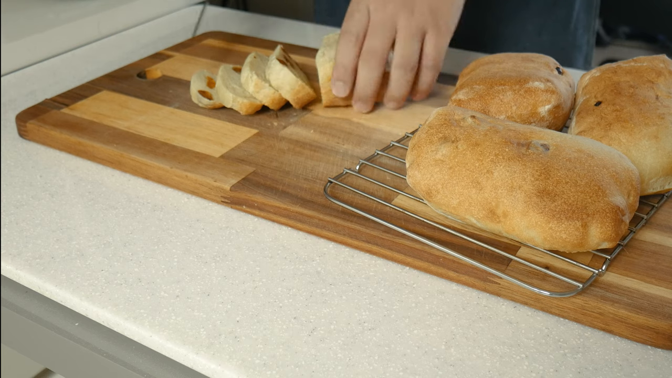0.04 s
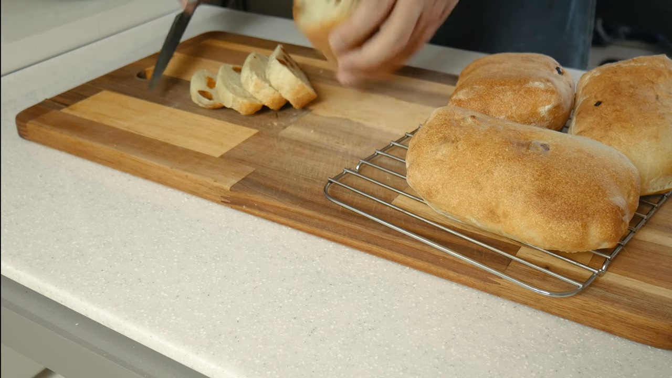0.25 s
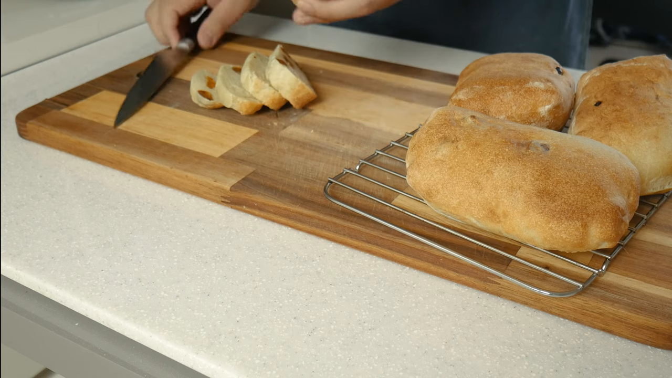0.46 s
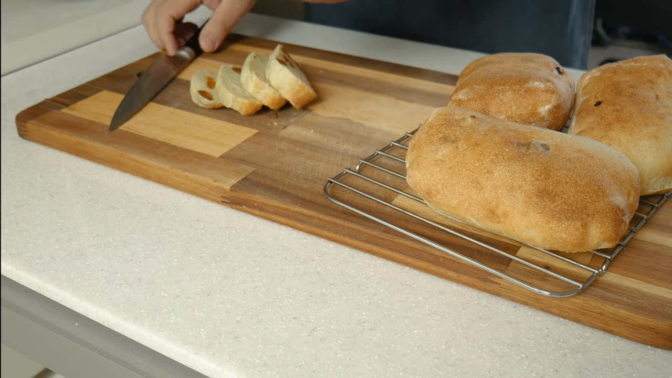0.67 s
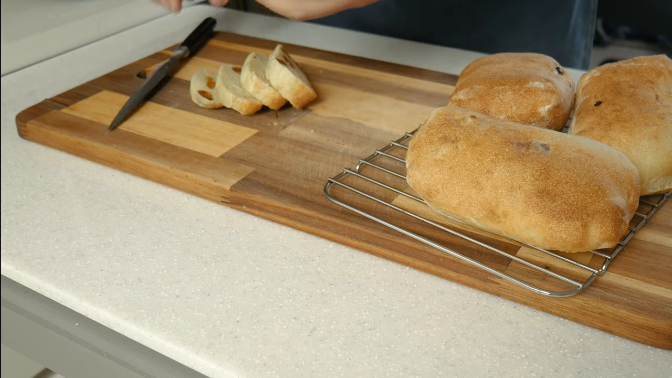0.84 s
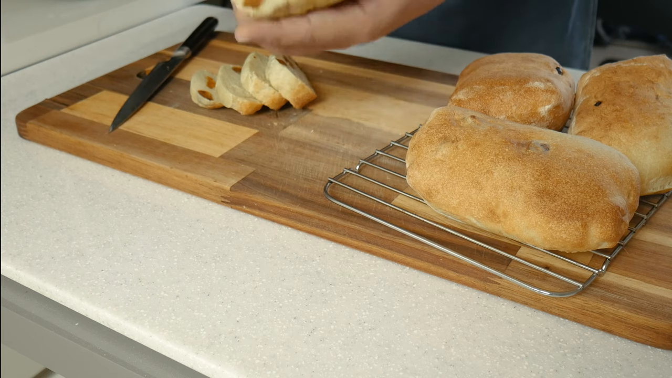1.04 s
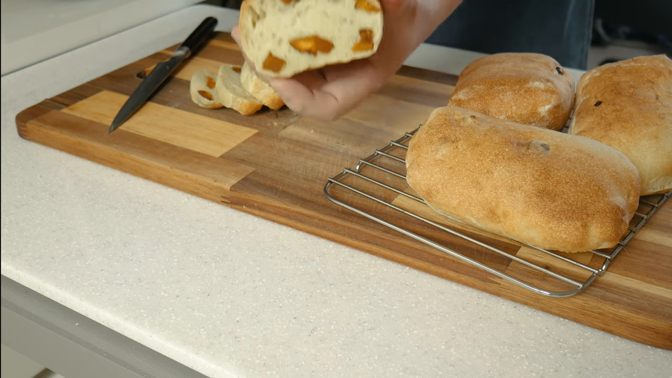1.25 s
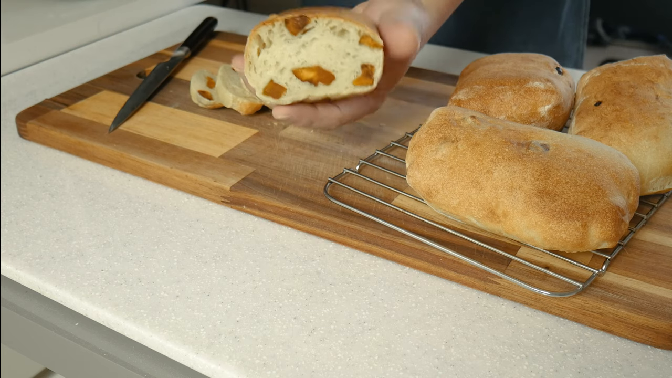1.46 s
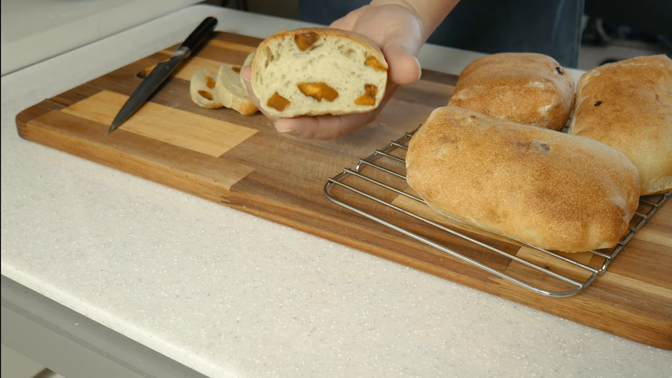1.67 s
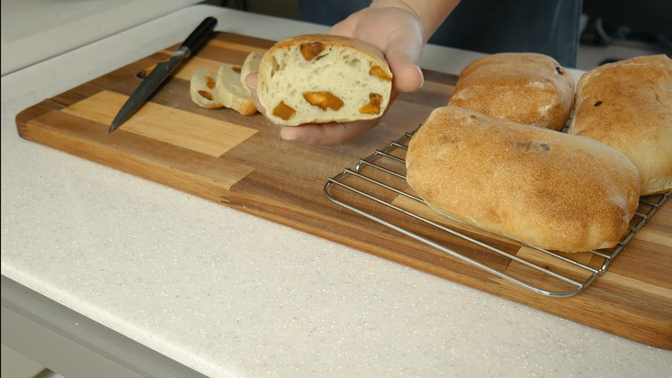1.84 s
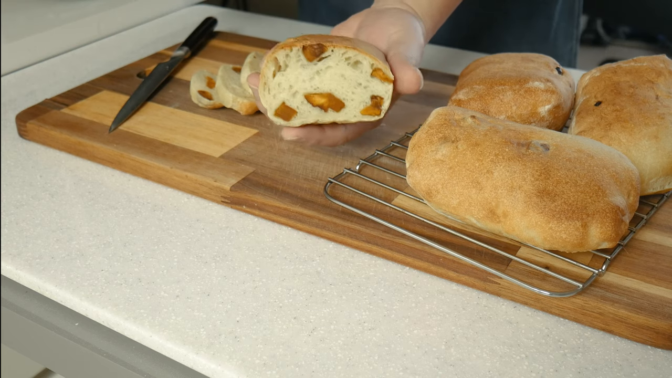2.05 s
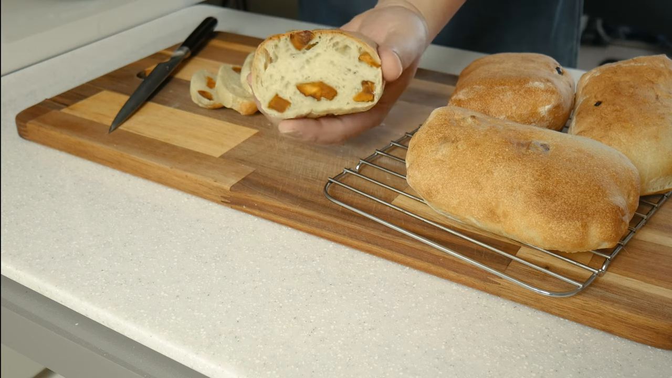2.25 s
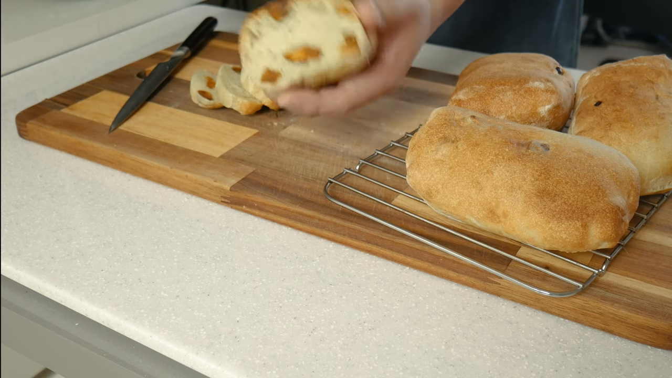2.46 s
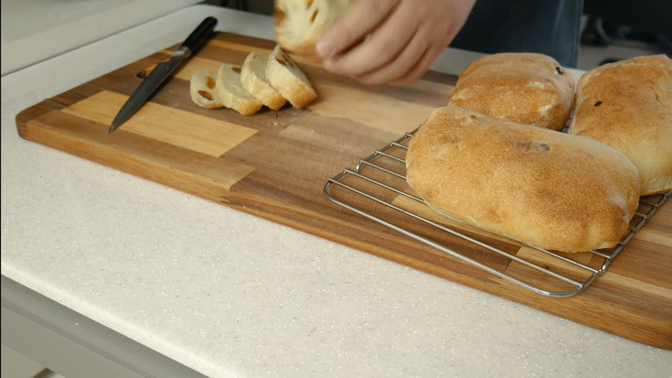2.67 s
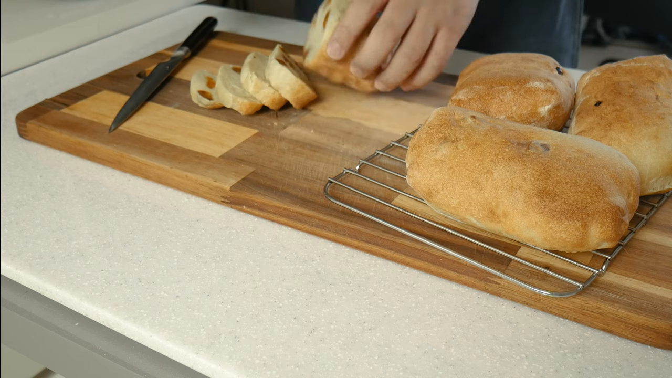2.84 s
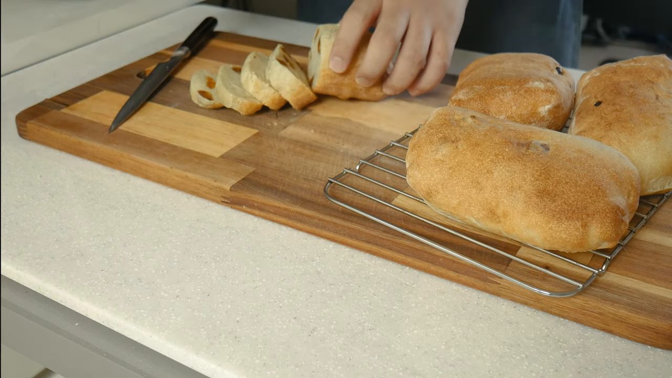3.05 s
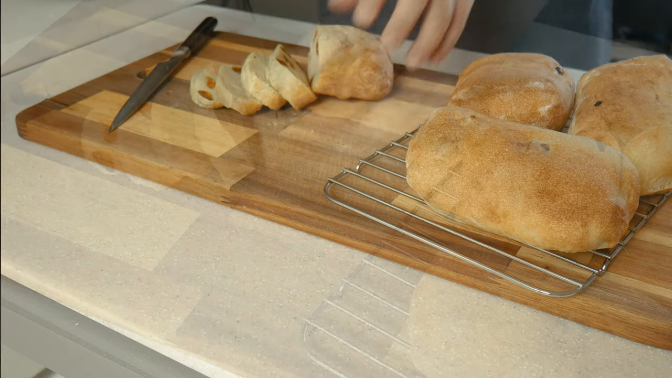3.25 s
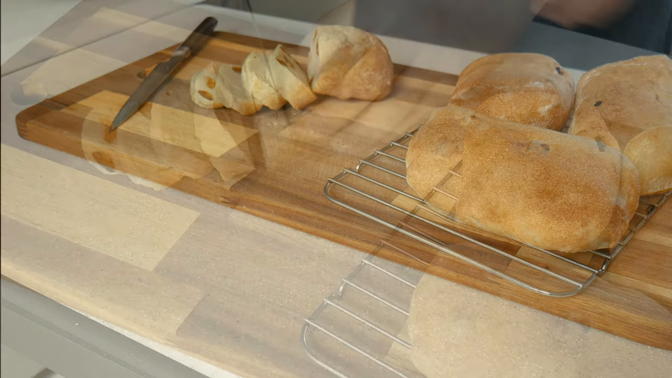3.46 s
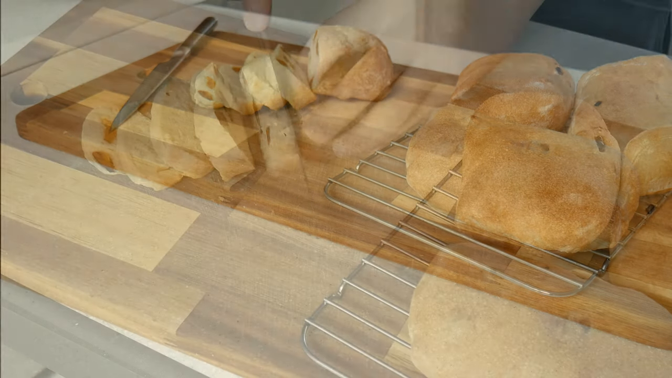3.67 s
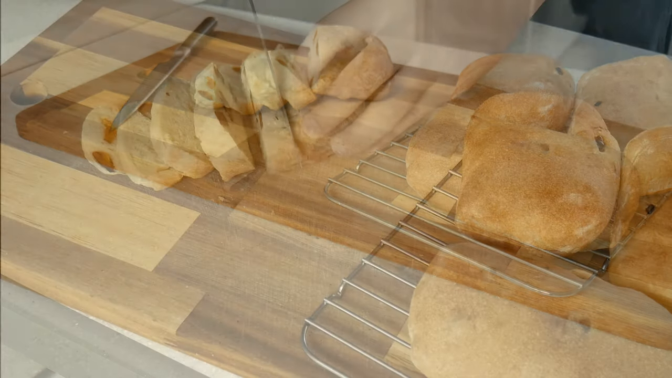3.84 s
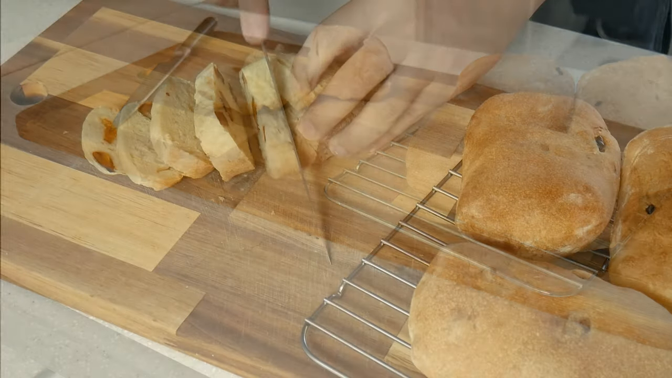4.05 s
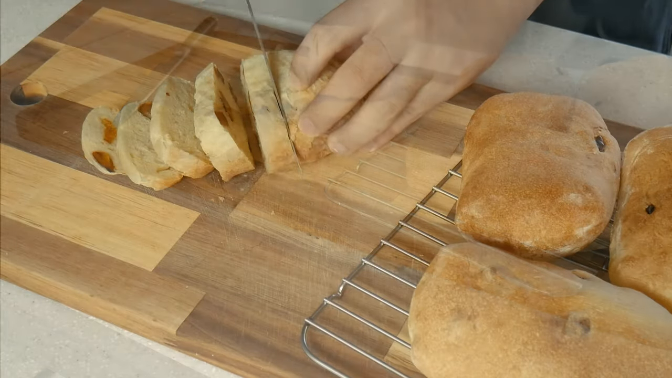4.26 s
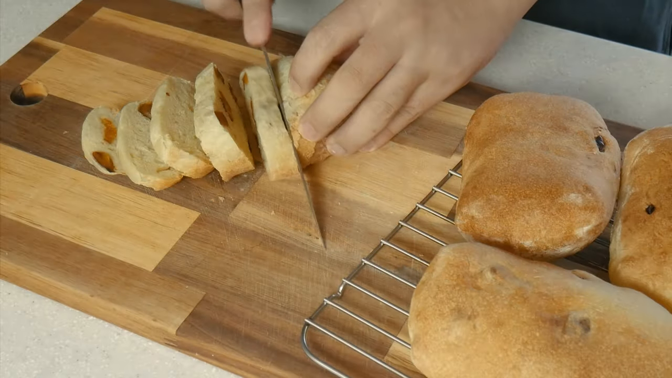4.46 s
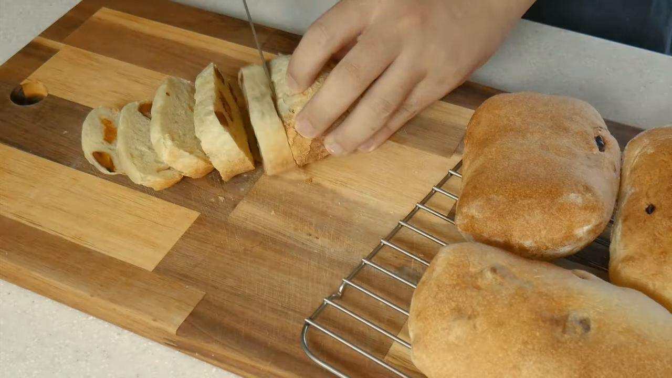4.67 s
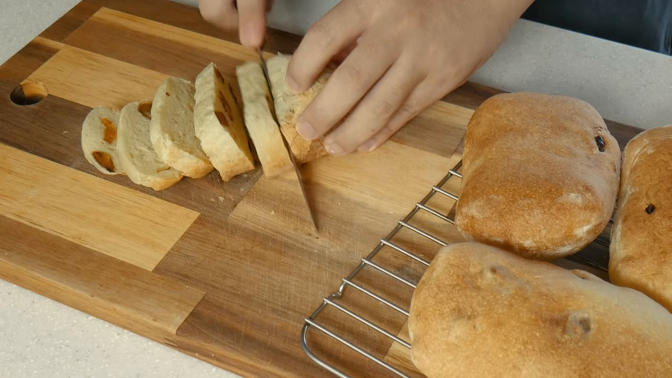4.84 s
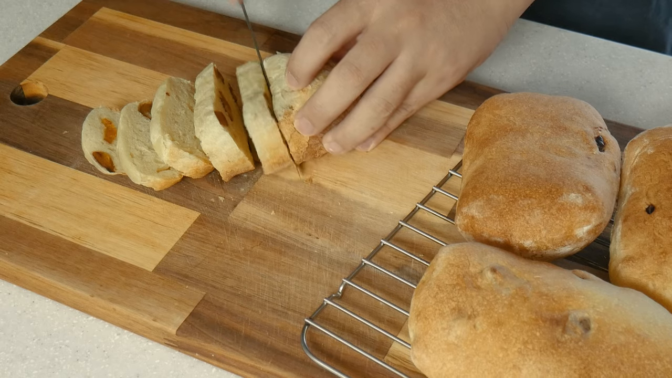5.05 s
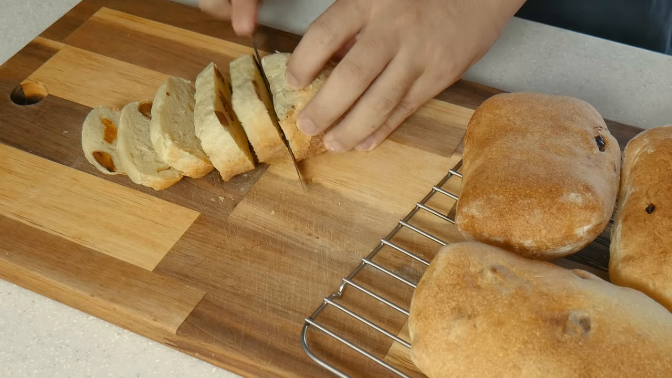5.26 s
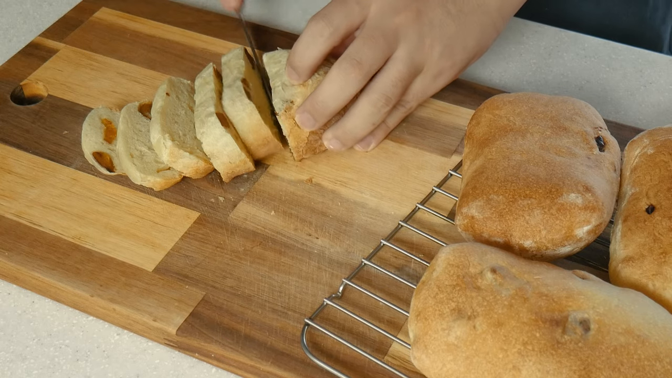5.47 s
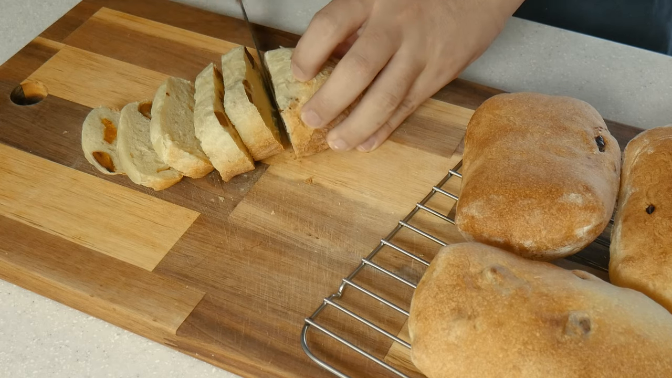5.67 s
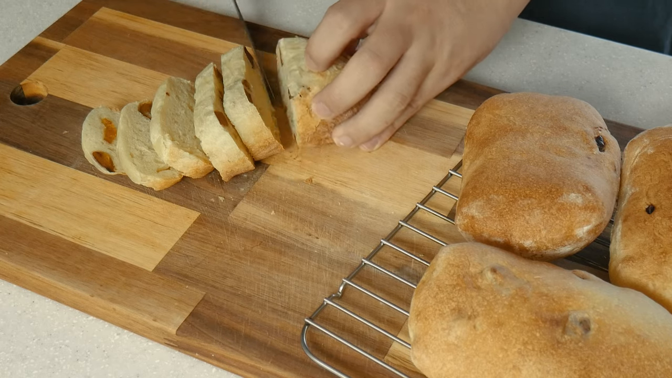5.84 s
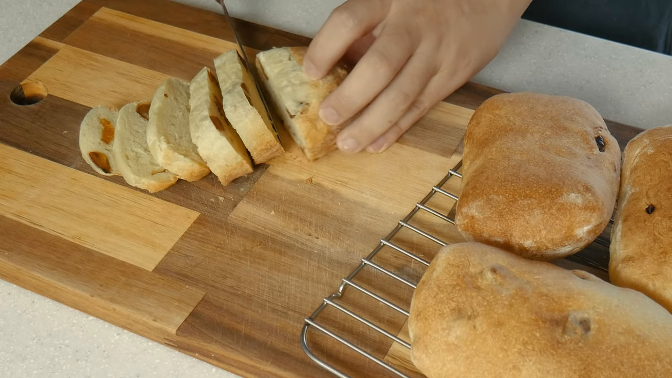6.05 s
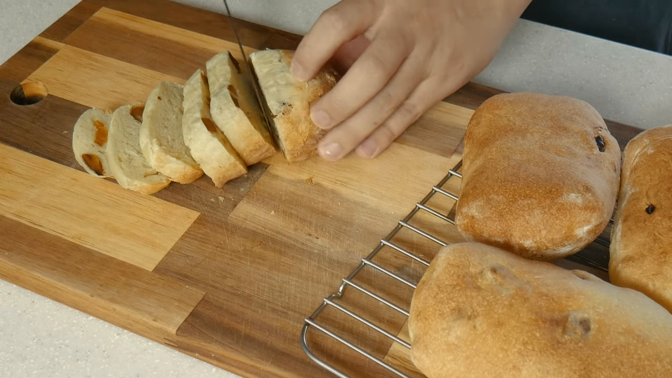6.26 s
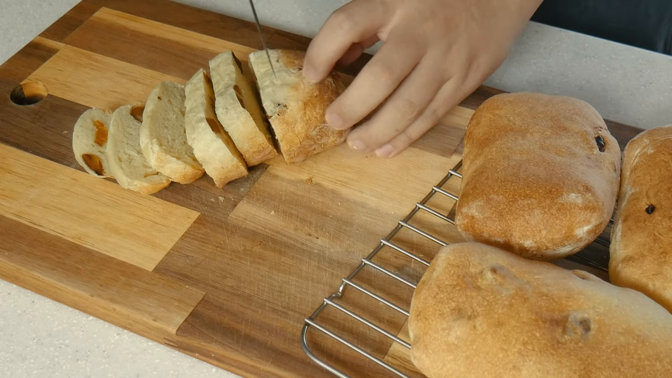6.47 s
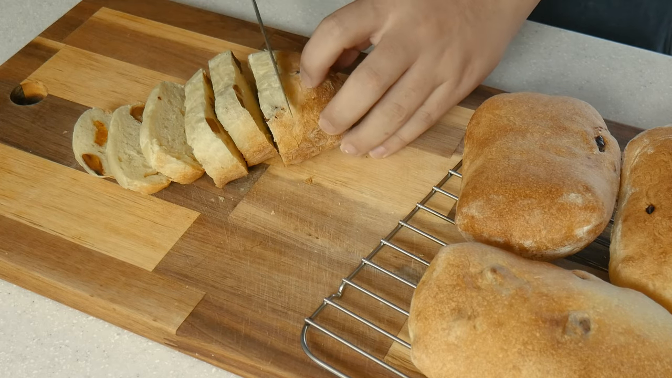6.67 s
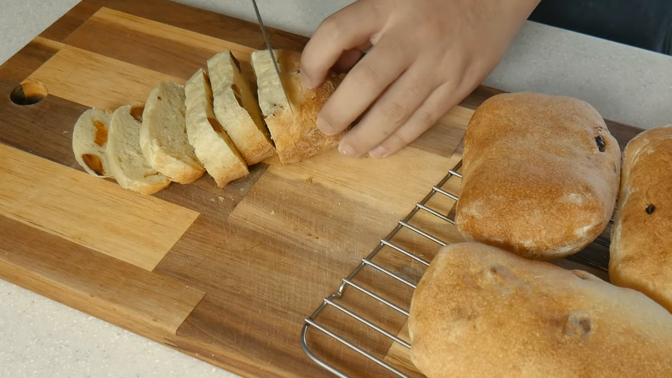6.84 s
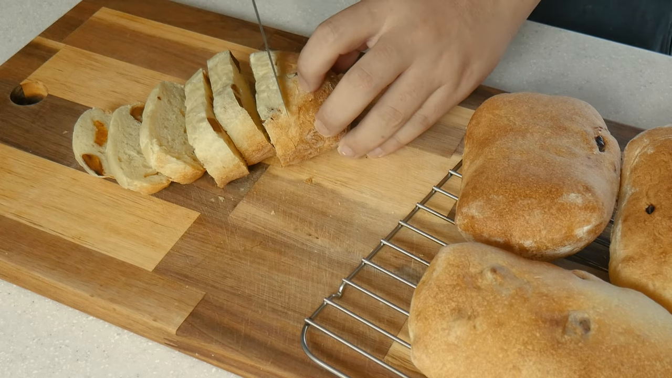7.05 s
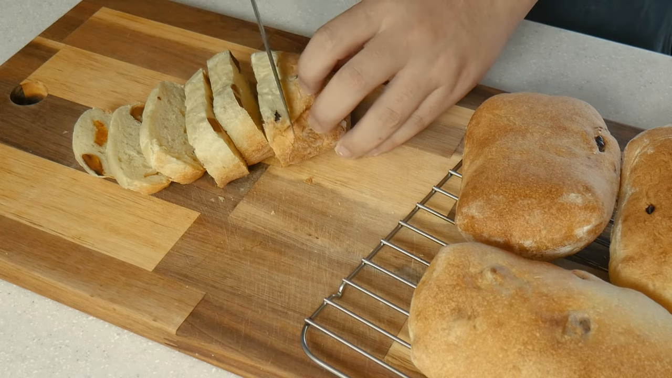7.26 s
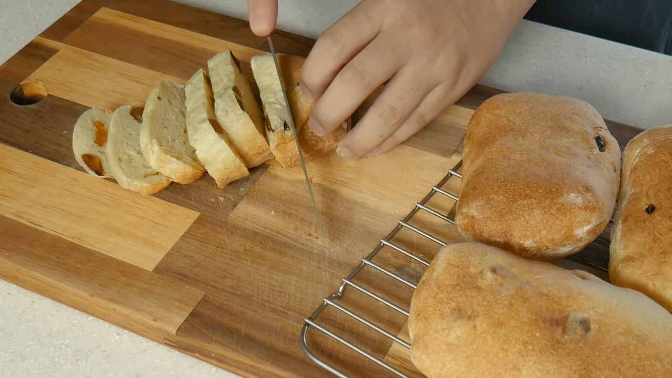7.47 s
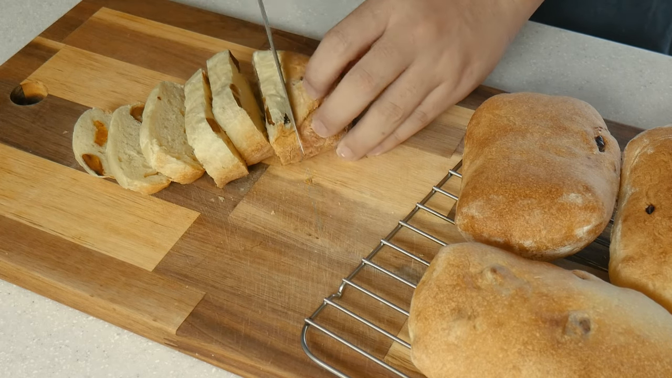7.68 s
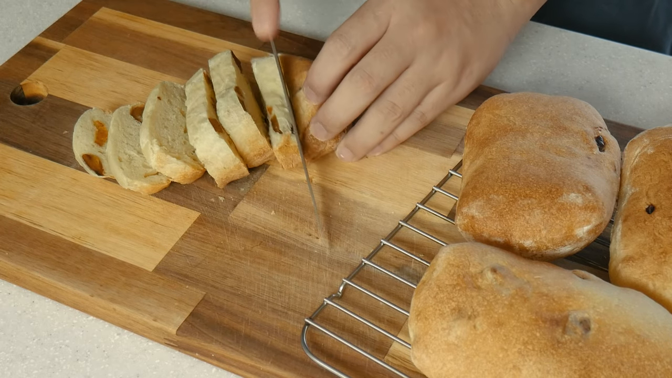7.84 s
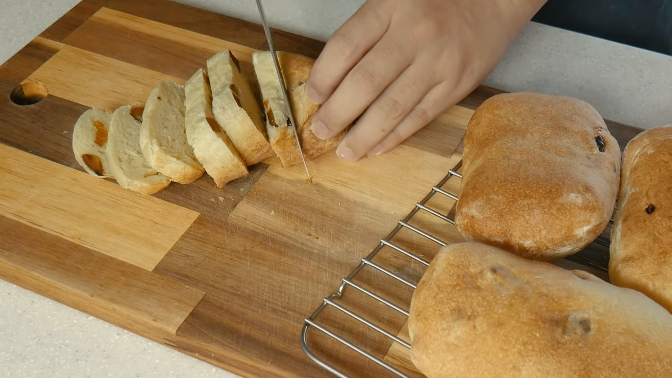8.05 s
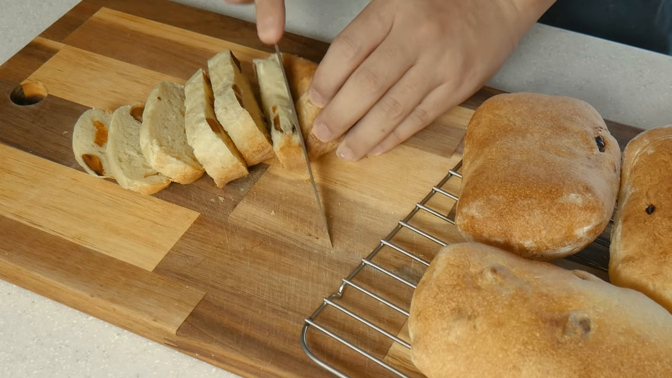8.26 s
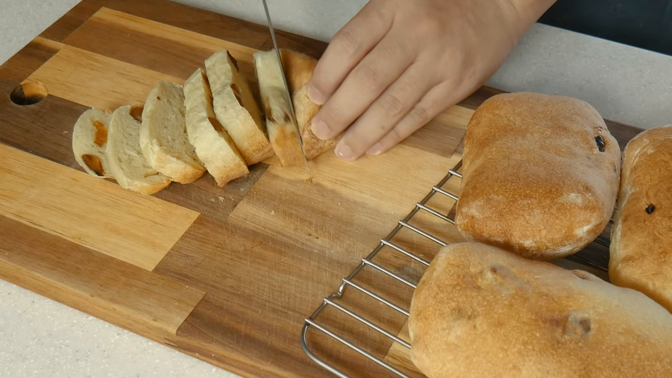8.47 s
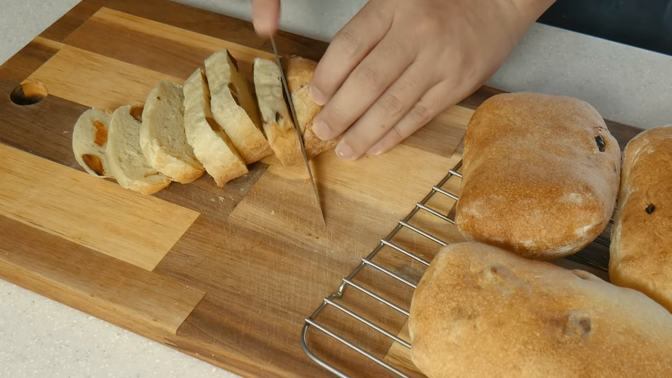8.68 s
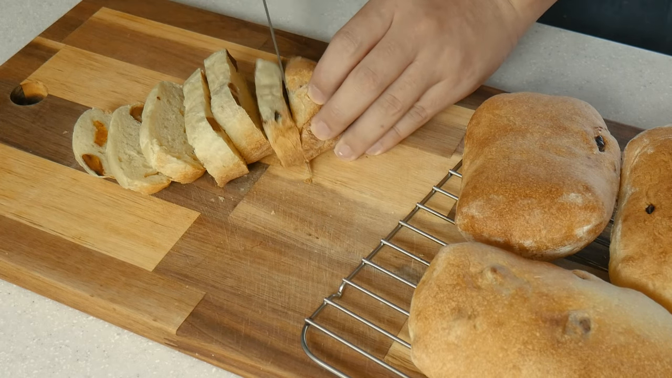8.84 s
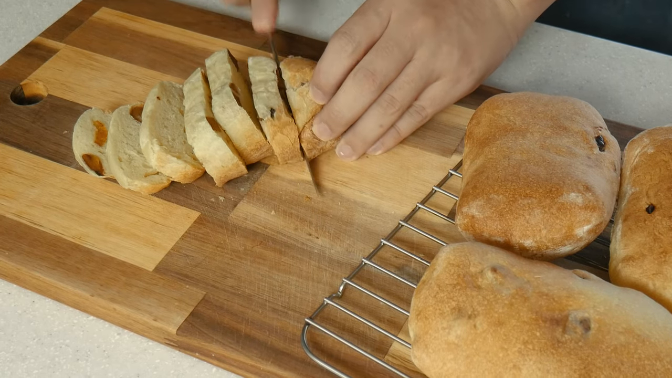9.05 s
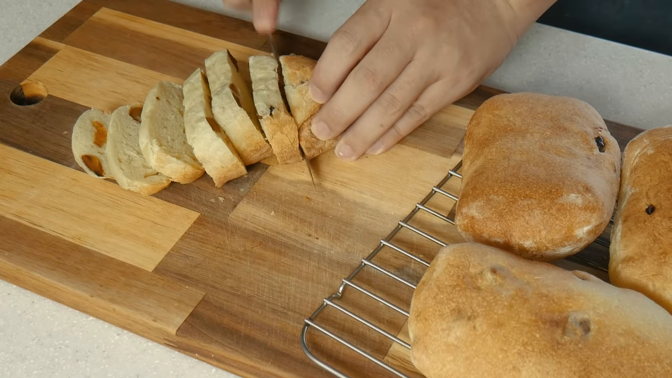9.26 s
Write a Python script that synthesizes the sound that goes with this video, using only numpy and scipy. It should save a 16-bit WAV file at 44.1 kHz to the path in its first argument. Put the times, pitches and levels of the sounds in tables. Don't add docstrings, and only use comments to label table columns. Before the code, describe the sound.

Close up in a small, hard-walled kitchen with faint room tone, a brief slide leads to a knife dropping on a wooden board: quick tip clinks, a loud handle slap, a short steel ring. Soft pats follow and a loaf lands with a dull thump. The background suddenly gets quieter, then a serrated blade saws crust to and fro in two bouts, crackling, rasping and knocking the board. Nearly mono camera microphone.

```python
import sys
import numpy as np
from scipy import signal
from scipy.fft import rfft, irfft, next_fast_len
from scipy.io import wavfile
from scipy.ndimage import uniform_filter1d

SR = 44100
rng = np.random.default_rng(int(sys.argv[2]) if len(sys.argv) > 2 else 0)


def transcribe(u):
    v = np.clip(np.atleast_2d(u).T, -1, 1)
    q = np.round(v * 32767).astype(np.int16)
    wavfile.write(sys.argv[1], SR, q)


def gain_from_db(level_db):
    decades = np.asarray(level_db, float) / 20
    return 10 ** decades


N = 410571

CUT_S = 3.022
ONSET_S = 0.0011

# [f/Hz, density/dB per Hz]
CRUST_SPECTRUM = [(820, -7), (1400, -14.5), (1470, -16.5), (1890, -1), (2630, -5), (3440, -3.5),
                  (4050, 0.5), (4490, -4), (6130, 2.5), (10300, -2.5), (11000, 0.5), (12500, -11),
                  (14000, -9.5), (16000, -22), (16500, -102)]


def unit(x):
    return x / np.sqrt(np.mean(x ** 2))


def noise():
    return rng.standard_normal(N)


def colour(x, spectrum):
    hz, db = np.transpose(spectrum)
    grid_hz = np.maximum(np.arange(2049) * SR / 4096, 1)
    ceps = irfft(np.interp(np.log(grid_hz), np.log(hz), db) * np.log(10) / 20)
    ceps[1:2048] *= 2
    ceps[2049:] = 0
    impulse = irfft(np.exp(rfft(ceps)))
    return signal.oaconvolve(x, impulse)[:len(x)]


def ring(x, modes):
    out = 0
    for k, (hz, width_hz, db) in enumerate(modes):
        peak = signal.iirpeak(hz, hz / max(width_hz, 3), SR)
        out = out + (-1) ** k * gain_from_db(db) * signal.lfilter(*peak, x)
    return out


def below(x, hz):
    return signal.sosfilt(signal.ellip(8, 0.2, 60, hz, fs=SR, output="sos"), x)


def walk(rate_hz):
    k = int(SR / rate_hz)
    held = np.repeat(rng.standard_normal(N // k + 1), k)
    return uniform_filter1d(uniform_filter1d(held, k), k)[:N]


def arcs(start_s, push_s, level_db, bite, fall_s):
    out = np.zeros(N)
    for s, rise_s, db in zip(start_s, np.maximum(push_s, 0.005), level_db):
        i = np.arange(max(int(s * SR), 0), min(int((s + rise_s + fall_s) * SR), N))
        t = np.maximum(i / SR - s, 0)
        swell = (t / rise_s) ** bite
        fade = np.clip(1 - (t - rise_s) / fall_s, 0, 1) ** 2
        out[i] += gain_from_db(db) * np.where(t < rise_s, swell, fade)
    return out


def swells(events, rise_t60_s):
    out = np.zeros(N)
    for s, db, t60_s in events:
        i = np.arange(int((s - rise_t60_s) * SR), min(int((s + t60_s) * SR), N))
        t = i / SR - s
        out[i] += gain_from_db(db - 60 * np.where(t < 0, -t / rise_t60_s, t / t60_s))
    return out


def strikes(events, body):
    out, t = np.zeros(N + SR), np.arange(SR // 2) / SR
    click = (t == 0) * 1.0
    shape = (len(events), len(t))
    rattles = rng.standard_normal(shape) * gain_from_db(1.1 * rng.standard_normal(shape))
    scale = np.abs(body(click)).max()
    for (s, db, t60_s, rattle_db, bright_db), rattle in zip(events, rattles):
        push = click + gain_from_db(rattle_db - 60 * t / max(t60_s, 0.004)) * rattle
        soft = signal.lfilter([0.25], [1, -0.75], push)
        i = int((s + ONSET_S) * SR)
        out[i:i + len(t)] += gain_from_db(db) / scale * body(soft + gain_from_db(bright_db) * (push - soft))
    return out[:N]


def short_rings(events, rise_t60_s):
    out, t = np.zeros(N + SR), np.arange(-SR // 10, SR // 4) / SR
    hisses = rng.standard_normal((len(events), len(t)))
    for (s, db, hz, width_hz, t60_s), hiss in zip(events, hisses):
        i = int(s * SR) - SR // 10
        decay = np.where(t < 0, -t / max(rise_t60_s, 0.001), t / max(t60_s, 0.005))
        out[i:i + len(t)] += unit(ring(hiss, [(hz, width_hz, 0)])) * gain_from_db(db - 60 * decay)
    return out[:N]


def grains(rate_hz, spread_db, bed_db):
    hit = rng.random(N) < rate_hz / SR
    size = np.minimum(rng.exponential(size=N), 4)
    fractures = unit(hit * gain_from_db(spread_db * size) * noise())
    return unit(fractures + gain_from_db(bed_db) * noise())


def patchy(x, modes, rate_hz, patchy_db, centre_hz, focus_db):
    out = 0
    for k, mode in enumerate(modes):
        off_centre_db = np.minimum(focus_db * np.log2(mode[0] / centre_hz) ** 2, 6.0)
        gain = gain_from_db(patchy_db * walk(rate_hz) - off_centre_db)
        out = out + (-1) ** k * gain * ring(x, [mode])
    return unit(out)


def steady(x, firmness):
    strength = np.abs(signal.hilbert(unit(x), next_fast_len(N))[:N])
    return unit(x / (strength + 0.1) ** firmness)


def kitchen():
    # [f/Hz, density/dB per Hz]
    early_spectrum = [(12, -39), (20, -7), (65, -4.5), (117, -8), (200, -4.5), (479, -6.5), (535, -5),
                      (1060, -10.5), (1280, -20), (2180, -23), (2370, -22.5), (5360, -26), (9410, -24.5),
                      (14300, -29), (16500, -39)]
    late_spectrum = [(12, -37), (20, -4), (71, -7), (179, -10.5), (200, -4), (323, -3), (393, -7),
                     (506, -3.5), (634, -8.5), (2310, -21), (4930, -22.5), (5360, -21), (7730, -23),
                     (15200, -24), (16500, -67)]
    t = np.arange(N) / SR
    early = gain_from_db(-49 - 0.33 * t) * unit(colour(noise(), early_spectrum))
    late = gain_from_db(-55.5 + 0.235 * walk(2.678)) * unit(colour(noise(), late_spectrum))
    drone = unit(ring(noise(), [(27.4, 12, 0)]))
    return np.where(np.arange(N) < CUT_S * SR, early + gain_from_db(-64.5) * drone, late + gain_from_db(-73.5) * drone)


def sawing():
    # [start/s, push/s, crust/dB,
    # rub/dB, wood/dB]
    slides = [(-.05, 0.121, -54, -59.5, -52.5), (.1, 0.251, -59.5, -65.5, -54)]
    saw_strokes = [(3.35, 0.099, -60, -77.5, -82.5), (3.43, 0.034, -58.5, -70, -81),
                   (3.48, 0.1696, -41, -56.5, -50), (3.742, 0.03, -44.5, -51.5, -50.5),
                   (3.761, 0.0892, -39, -69, -51), (3.94, 0.111, -34.5, -41.5, -42.5),
                   (4.121, 0.095, -36.5, -41.5, -47.5), (4.318, 0.1027, -36.5, -40.5, -44),
                   (4.497, 0.1029, -38.5, -37, -47.5), (4.682, 0.0745, -40.5, -41, -48),
                   (4.79, 0.034, -55.5, -57, -54.5), (4.868, 0.0267, -37, -40, -49.5),
                   (4.93, 0.1487, -42.5, -50.5, -49.5), (5.115, 0.0258, -31.5, -40.5, -34),
                   (5.221, 0.121, -41.5, -32.5, -42), (5.36, 0.0314, -55, -45, -76),
                   (5.441, 0.086, -41.5, -34, -42.5), (5.595, 0.0687, -44.5, -34, -56.5),
                   (5.68, 0.0885, -46, -36.5, -49.5), (5.89, 0.095, -48, -44.5, -48.5),
                   (6.0, 0.066, -63.5, -55.5, -62), (6.09, 0.1127, -50.5, -48, -53),
                   (7.085, 0.0376, -50, -69.5, -54.5), (7.17, 0.071, -49.5, -65, -56),
               (7.26, 0.1844, -44.5, -54.5, -50), (7.529, 0.095, -42.5, -47, -53.5),
               (7.67, 0.03, -58, -69.5, -65), (7.74, 0.1215, -36, -40.5, -40.5),
               (7.943, 0.0823, -35.5, -38.5, -42), (8.123, 0.0996, -35, -41.5, -43),
               (8.29, 0.1063, -41, -43, -48), (8.475, 0.1052, -36.5, -41.5, -39),
               (8.661, 0.101, -43, -48.5, -44.5), (8.849, 0.0847, -39.5, -41.5, -40.5),
               (9.028, 0.0843, -46.5, -44.5, -47.5), (9.13, 0.084, -57, -64.5, -60),
               (9.21, 0.085, -45.5, -44, -41.5), (9.248, 0.0375, -52, -40, -46.5)]
    # [start/s, length/s, level/dB]
    hums = [(4.07, 0.055, -35), (4.434, 0.044, -41.5), (4.514, 0.0247, -39), (4.772, 0.0374, -45),
            (4.871, 0.043, -43), (5.121, 0.0634, -28.5), (5.229, 0.115, -51), (5.506, 0.03, -48),
            (5.738, 0.033, -52), (5.948, 0.033, -35.5), (5.997, 0.0181, -36), (6.032, 0.0414, -43.5),
            (6.198, 0.034, -53), (7.798, 0.058, -59.5), (8.232, 0.0196, -35), (8.309, 0.071, -45),
            (8.536, 0.037, -32.5), (8.968, 0.016, -40), (9.117, 0.0404, -47.5), (9.252, 0.034, -44.5)]
    # [f/Hz, width/Hz, level/dB]
    rub_modes = [(1866, 240, 14), (2250, 255, 20.5), (2700, 327, 20), (3258, 307, 23), (3524, 840, 15.5),
                 (4333, 453, 16), (5270, 500, 7)]
    wood_modes = [(640, 345, -18.5), (751, 274, -0.5), (889.7, 83.7, 3.5), (1002, 69.4, 2),
                  (1120, 80, -1.5), (1237.8, 98.7, -2.5), (1390, 150, -37)]
    hum_modes = [(509.46, 21, 0)]
    # [t/s, f/Hz]
    wood_pitch = [(0, 1120), (3.9, 1173), (5.1, 1068), (5.66, 1050), (5.76, 880), (6.2, 1158), (7.8, 1225),
                  (8.6, 1170), (9.3, 1155)]
    # [f/Hz, density/dB per Hz]
    scrape_spectrum = [(1000, -34), (1700, -2), (2700, 2), (4000, 1), (5000, -5.5), (6500, -1),
                       (9000, -42.5), (12000, -34)]

    start_s, push_s, crust_db, rub_db, wood_db = np.transpose(slides + saw_strokes)
    crust = arcs(start_s, push_s, crust_db, bite=0.496, fall_s=0.1243)
    rub = arcs(start_s, push_s, rub_db, bite=0.375, fall_s=0.1058)
    wood = arcs(start_s, push_s, wood_db, bite=0.456, fall_s=0.1523)
    hum = arcs(*np.transpose(hums), bite=0.053, fall_s=0.0282) + gain_from_db(-11.5) * wood

    teeth = grains(rate_hz=6000, spread_db=-3.0, bed_db=2.5) * gain_from_db(0.92 * walk(70) + 0.74 * walk(200))
    drag = grains(rate_hz=2500, spread_db=4.0, bed_db=0.0) * gain_from_db(1.73 * walk(60))
    pitch_hz = np.interp(np.arange(N) / SR, *np.transpose(wood_pitch))
    crumb = patchy(teeth + 0.6 * drag, rub_modes, rate_hz=25, patchy_db=2.0, centre_hz=2800, focus_db=3.0)
    board = patchy(drag, wood_modes, rate_hz=30, patchy_db=2.5, centre_hz=pitch_hz, focus_db=69.0)
    grip = np.clip(rub / gain_from_db(-32.5), 0, 1)
    rubbing = grip * crumb + (1 - grip) * unit(colour(drag, scrape_spectrum))
    humming = steady(ring(ring(teeth, hum_modes), hum_modes), firmness=0.823)
    breaking = unit(colour(teeth, CRUST_SPECTRUM))
    return crust * breaking + rub * rubbing + wood * board + gain_from_db(-3.5) * hum * humming


def tip_clinks():
    # [t/s, peak/dB, rattle t60/s, rattle/dB, brightness/dB]
    clinks = [
        (.0548, -40.5, 0.144, -12.5, -6.5),
        (.4288, -28, 0.184, -19.5, -1),
        (.4795, -29.5, 0.22, -19.5, 9.5),
        (.5122, -23, 0.277, -18.5, 1.5),
        (.546, -16.5, 0.081, -20.5, -32.5),
        (.574, -27.5, 0.43, -19.5, -16),
    ]
    # [f/Hz, width/Hz, level/dB]
    tip_modes = [(870, 337, -5.5), (2192, 244, -4.5), (3030, 110, -7.5), (3900, 172, 4.5), (4120, 50, 5),
                 (4660, 88, 0.5), (5680, 110, -24.5), (6900, 70, -8), (7100, 110, -3.5), (8450, 84, -20),
                 (8700, 130, -1.5), (10030, 220, -16.5), (11000, 150, -11), (13450, 200, -35)]
    return strikes(clinks, lambda x: ring(x, tip_modes) + gain_from_db(-11.5) * colour(x, CRUST_SPECTRUM))


def counter():
    # [peak t/s, thud/dB, upper thud/dB]
    drop_thuds = [
        (.5, -59.5, -45),
        (.68, -50, -43.5),
        (.75, -51.5, -40.5),
    ]
    push_thuds = [(4.2, -61, -73), (4.55, -57.5, -55), (4.89, -59.5, -49), (4.94, -54.5, -60),
                  (5.19, -42.5, -45), (5.29, -48, -51.5), (5.57, -50, -73.5), (7.99, -51.5, -58),
                  (8.36, -52, -52), (8.71, -50.5, -55), (9.06, -46, -47), (9.23, -52, -64)]

    def band(hz, width_hz):
        once = ring(noise(), [(hz, width_hz, 0)])
        return unit(ring(once, [(hz, 0.98 * width_hz, 0)]))

    def thuds(events):
        rise_s = 0.119
        s, *levels = np.transpose(events)
        return [arcs(s - rise_s, rise_s + 0 * s, db, bite=1.81, fall_s=0.147) for db in levels]

    drop, drop_upper = thuds(drop_thuds)
    push, push_upper = thuds(push_thuds)
    low = (drop + push) * band(hz=72.45, width_hz=17.0)
    upper = drop_upper * band(hz=194.67, width_hz=10.25)
    return low + upper + push_upper * band(hz=160.0, width_hz=77)


def glances():
    # [t/s, peak/dB, f/Hz, width/Hz, t60/s]
    glance_events = [(.4300, -38, 4660, 150, 0.059), (.4300, -37, 7100, 200, 0.042),
                     (.4340, -35.5, 3902, 150, 0.091), (.4810, -27, 7100, 150, 0.055),
                     (.4810, -37, 8700, 200, 0.045), (.5135, -21, 7100, 150, 0.074),
                     (.5125, -38.5, 8700, 200, .05), (.518, -42, 5940, 120, 0.16),
                     (.522, -26, 4067, 150, 0.074), (.481, -47.5, 11000, 120, 0.068),
                     (.5125, -43, 11000, 120, .1), (.5125, -46.5, 13450, 150, .1),
                     (.5465, -31, 2250, 300, 0.13), (.574, -35, 870, 150, 0.091),
                     (.672, -32, 562, 250, 0.326), (.699, -35.5, 7300, 1500, .04),
                     (.655, -28, 914, 500, 0.238), (.66, -38, 4050, 150, 0.074),
                     (.646, -46.5, 6630, 80, 0.246), (.703, -30, 1102, 60, 0.063),
                     (.715, -23, 1130, 60, 0.074), (.736, -31, 1113, 60, 0.14)]
    return short_rings(glance_events, rise_t60_s=0.0043)


def peals():
    # [t/s, peak/dB, f/Hz, t60/s]
    partials = [(.431, -40.5, 3940, 0.196), (.481, -41, 5900, .15), (.481, -45.5, 10000, .12),
                (.481, -42.5, 8300, .15), (0.515, -27, 3899, 0.132), (.514, -32.5, 5892, 0.23),
                (0.515, -46.5, 6697, .3), (.548, -46, 5254, 0.32), (0.646, -41, 5254, 0.54),
                (.645, -36, 6605, 0.276), (.645, -31.5, 4135, .16), (0.646, -40, 8333, .3),
                (.700, -38, 5254, 0.182), (.700, -26.5, 1112, 0.46), (.700, -38, 1890, 0.27),
                (.700, -40, 4330, 0.32)]
    out, t = np.zeros(N + SR), np.arange(SR // 2) / SR
    for s, db, hz, t60_s in partials:
        i = int(s * SR)
        out[i:i + len(t)] += gain_from_db(db - 60 * t / max(t60_s, 0.01)) * np.sin(2 * np.pi * hz * t)
    return out[:N]


def handle_slaps():
    # [t/s, peak/dB, rattle t60/s, rattle/dB, brightness/dB]
    slaps = [
        (0.644, -12, 0.453, -29.5, -3.5),
        (0.66, -21.5, 0.204, -33, -11),
        (0.699, -13.5, 0.21, -34.5, -6),
        (0.702, -17.5, 0.268, -24, 3),
        (0.716, -28, 0.21, -21.5, 3),
    ]
    heel = [(.6443, -1.83, .01, -63.5, 0)]
    # [f/Hz, width/Hz, level/dB]
    knife_modes = [(332, 9.1, -7.5), (460, 22, -13), (661, 48, -10), (880, 160, -10), (1120, 42.8, -1),
                   (1236, 23.6, -6.5), (1610, 20, -46), (1800, 123, -8), (2057, 152, -19.5),
                   (2728, 30, -13), (2957, 65, -14.5), (3680, 31, -42.5), (4120, 57, -13), (4330, 27, -16),
                   (5254, 48, -16.5), (6630, 35, -19.5), (7390, 71, -26.5), (8280, 61, -23.5),
                   (10500, 240, -27)]
    heel_modes = [(1585, 1400, 0)]
    # [f/Hz, density/dB per Hz]
    slap_spectrum = [(180, -44.5), (300, -17.5), (801, -10), (1110, -13), (2140, -2.5), (3070, -19),
                     (4180, -6.5), (4850, -36), (6620, -15), (15000, -72)]
    drop = strikes(slaps, lambda x: gain_from_db(9.0) * ring(x, knife_modes) + colour(x, slap_spectrum))
    smack = strikes(heel, lambda x: -ring(ring(x, heel_modes), heel_modes))
    return drop + smack


def loaf_pats():
    # [t/s, peak/dB, rattle t60/s, rattle/dB, brightness/dB]
    pats = [
        (1.11, -39.5, 0.59, -26, 9.5),
        (1.279, -45.5, 0.227, -15, 8),
        (2.23, -34.5, 0.063, -24, -11),
        (2.9458, -12.5, 0.224, -30, 1),
        (2.98, -26.5, 0.079, -21, 6.5),
        (3.2335, -27.5, 0.102, -20.5, 0),
        (3.291, -42, 0.195, -16.5, 8.5),
    ]
    # [f/Hz, density/dB per Hz]
    pat_spectrum = [(59, -69.5), (100, -21.5), (197, -2), (365, -9.5), (442, -5), (634, -12.5), (970, -8.5),
                    (1280, -13), (3700, -21.5), (4600, -25), (5500, -19.5), (10000, -25.5), (14700, -42),
                    (16000, -60)]
    return strikes(pats, lambda x: colour(x, pat_spectrum))


def steel_sings():
    # [peak t/s, level/dB, t60/s]
    whines = [(3.5, -63, 0.47), (5.37, -41.5, 0.147), (5.8, -51.5, 0.143), (7.42, -56.5, 0.3),
              (7.69, -60, 0.18)]
    sings = [(5.815, -53.5, 0.35), (5.99, -47.5, 0.53)]
    pings = [(6.81, -59.5, 0.2)]
    # [f/Hz, width/Hz, level/dB]
    whine_modes = [(4152, 70, 0)]
    steel_modes = [(5290, 34, -16.5), (6690, 42, -4.5), (8300, 50, 3.5), (10060, 81, -2.5)]
    slide = noise()
    sing = swells(sings, rise_t60_s=0.12) * unit(ring(slide, steel_modes))
    ping = swells(pings, rise_t60_s=0.24) * unit(ring(slide, steel_modes[:1]))
    whine = swells(whines, rise_t60_s=0.76) * unit(ring(slide, whine_modes))
    return sing + ping + whine


def cracks():
    # [t/s, peak/dB, flake f/Hz, crumbling t60/s]
    loud_cracks = [(3.308, -37, 6900, 0.016), (3.766, -29.5, 7100, 0.065), (4.0687, -17, 4120, 0.015),
                   (4.42, -15.5, 5820, 0.0053), (4.5222, -18, 2830, 0.036), (4.504, -25, 2600, 0.024),
                   (4.7138, -29.5, 2600, .02), (4.813, -34, 13100, .01), (4.8796, -14.5, 5960, 0.0088),
                   (4.89, -18, 6200, 0.0099), (4.9727, -24.5, 5730, 0.016), (5.0124, -17.5, 3370, 0.0082),
                   (5.028, -33, 11000, .01), (5.08, -37.5, 6110, .015), (5.1216, -9.5, 3380, 0.0041),
                   (6.559, -41, 2750, 0.056), (7.1007, -25.5, 10500, 0.013), (7.113, -31.5, 10400, 0.035),
                   (7.14, -36, 3950, 0.023), (7.1694, -31, 6630, 0.022), (7.215, -34.5, 1974, 0.027),
                   (7.2155, -33, 5820, 0.027), (7.282, -29.5, 5960, 0.023), (7.741, -38.5, 5990, 0.03),
                   (7.95, -27, 2850, 0.048), (8.226, -28, 3000, .015), (8.241, -20.5, 2150, 0.023),
                   (8.975, -32, 3015, 0.0112), (8.8859, -24, 5410, .02), (8.895, -25, 6000, .015),
                   (9.1, -29, 2020, 0.021), (9.2062, -37, 2720, .02), (9.256, -29.5, 2980, 0.0296),
                   (9.2943, -26, 5900, 0.0147)]
    dull_taps = [(3.238, -28, 1044, 0.029), (5.1624, -26.5, 965, 0.025), (6.566, -32, 989, 0.045),
                 (6.61, -36, 970, 0.038), (8.127, -29, 1170, 0.053), (8.6975, -21, 1120, 0.02),
                 (8.8445, -28, 1040, 0.02), (9.3, -20, 1304, 0.091)]
    crunches = [(3.951, -28.5, 2680, 0.063), (4.142, -20.5, 3160, 0.029), (4.169, -19, 3030, 0.0274),
                (4.346, -23, 3060, 0.038), (4.555, -15, 2940, 0.039), (4.5605, -19, 2220, .03),
                (4.568, -26.5, 2710, .027), (4.575, -20, 3010, .02), (4.5844, -20.5, 3300, 0.047),
                (8.8627, -29.5, 2630, 0.0165), (5.297, -26, 2900, .02)]
    # [f/Hz, density/dB per Hz]
    snap_spectrum = [(400, -11.5), (1000, -17), (3400, 3), (4600, -5.5), (6100, -1.5), (10300, -5),
                     (12300, -15), (14000, -8.5), (16800, -22), (17200, -63)]
    out, t = np.zeros(N + SR), np.arange(SR // 8) / SR
    impulse = (t == 0) * 1.0
    click = colour(impulse, snap_spectrum)
    click = click / np.abs(click).max()
    for events, click_db in ((loud_cracks, 0), (dull_taps, -6.5), (crunches, -14.5)):
        hisses = rng.standard_normal((len(events), len(t)))
        for (s, db, hz, t60_s), hiss in zip(events, hisses):
            crumbling = gain_from_db(-7.5) * gain_from_db(-60 * t / max(t60_s, 0.003)) * hiss
            flake = ring(impulse + crumbling, [(hz, 0.126 * hz, 0)])
            flake = flake / np.abs(flake).max()
            click_gain = gain_from_db(6.0 + 0.19 * db + click_db)
            i = int((s + ONSET_S / 2) * SR)
            out[i:i + len(t)] += gain_from_db(db) * (0.544 * flake + click_gain * click)
    return out[:N]


def board_knocks():
    # [t/s, peak/dB, rattle t60/s, rattle/dB, brightness/dB]
    knocks = [(4.068, -12.5, 0.197, -31.5, -5), (4.4315, -17.5, 0.0803, -21.5, -1.5),
              (4.882, -22, 0.129, -28, -17.5), (5.1205, -32.5, 0.147, -15.5, -43),
              (8.239, -14, 0.132, -29.5, 4), (8.535, -17, 0.074, -24, -14.5),
              (8.695, -36.5, 0.144, -29.5, 20), (8.895, -27, 0.089, -24.5, 2.5)]
    # [f/Hz, width/Hz, level/dB]
    board_modes = [(333.3, 46, -8), (401.5, 28.8, -5.5), (504.26, 20.7, 7.5), (648, 160, -7.5),
                   (992.5, 133, -2.5), (1184, 310, -16.5), (1715, 353, -15.5), (2176, 113, -24)]
    return strikes(knocks, lambda x: ring(x, board_modes))


def squeaks():
    # [t/s, peak/dB, f/Hz, width/Hz, t60/s]
    squeak_events = [(4.29, -45, 1030, 200, 0.12), (4.29, -47, 500, 100, 0.2),
                     (4.345, -41.5, 3030, 250, 0.057), (4.742, -42, 336, 60, 0.069),
                     (5.166, -21, 1016, 148, 0.053), (5.15, -31.5, 2880, 500, 0.091),
                     (5.27, -34.5, 1032, 90, 0.247), (5.32, -33, 987, 90, 0.11),
                     (5.33, -45.5, 2700, 400, 0.11), (5.52, -36, 2460, 500, 0.167),
                     (5.545, -32, 1016, 120, 0.111), (5.61, -61, 5400, 200, .15),
                     (5.64, -33.5, 1035, 120, 0.177), (5.685, -33.5, 1088, 120, 0.095),
                     (5.69, -32.5, 2230, 100, 0.112), (5.7, -30.5, 2740, 300, 0.1),
                     (5.72, -39.5, 867, 80, 0.11), (5.775, -46.5, 910, 100, 0.157),
                     (5.8, -40.5, 2450, 400, 0.108), (6.17, -45, 1146, 200, 0.176),
                     (5.975, -51, 6710, 120, 0.13), (5.975, -45.5, 8370, 350, 0.155),
                     (7.51, -47, 550, 250, 0.28), (7.62, -47, 6700, 300, .12),
                     (8.14, -44.5, 1153, 100, 0.122), (8.265, -37.5, 1800, 150, 0.33),
                     (8.935, -37, 2380, 300, 0.176), (9.065, -38, 2584, 253, 0.107),
                     (9.065, -49, 5300, 250, 0.084), (9.1, -47, 4250, 300, .04),
                     (9.035, -42.5, 199, 100, 0.17)]
    return short_rings(squeak_events, rise_t60_s=0.0696)


def room(x):
    t = np.arange(SR // 2) / SR
    tail = rng.standard_normal(len(t)) * gain_from_db(-60 * t / 0.419) * (t > 0.004)
    tail = signal.lfilter(*signal.butter(1, 5100, fs=SR), tail)
    return signal.oaconvolve(x, gain_from_db(-13.5) * tail / np.linalg.norm(tail))[:len(x)]


def stereo_trace(close, tone):
    # [f/Hz, side minus mid/dB]
    side_spectrum = [(60, -20.5), (110, -27), (200, -23), (380, -22.5), (700, -23), (1290, -18),
                     (2380, -14), (4400, -12), (8120, -11), (15000, -7)]
    trace = walk(250)
    trace = unit(trace - uniform_filter1d(trace, size=2000))
    source = tone + gain_from_db(-6.5) * np.tanh(10 * close) / 10
    return gain_from_db(-1.0) * colour(source * trace, side_spectrum)


def scene():
    top_hz = 15950
    tone = below(kitchen(), top_hz)
    near = sawing() + tip_clinks() + glances() + peals() + handle_slaps() + loaf_pats()
    near = near + steel_sings() + board_knocks() + squeaks()
    snaps = cracks()
    near = near + snaps
    cut = int(CUT_S * SR)
    close = near + np.r_[room(near[:cut]), room(near[cut:])] + counter()
    close = below(close - snaps, top_hz) + snaps
    side = stereo_trace(close, tone)
    return np.array([close + tone + side, close + tone - side])


def top_cut(x):
    return signal.sosfilt(signal.butter(12, 17150, fs=SR, output="sos"), x)


def record(dry):
    mix = below(dry, 17000)
    return top_cut(mix)


dry = scene()
out = record(dry)
transcribe(out)
```